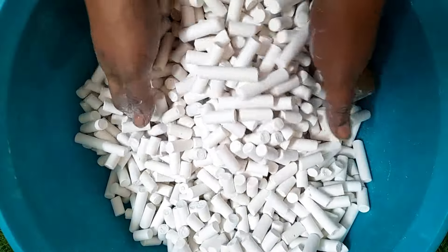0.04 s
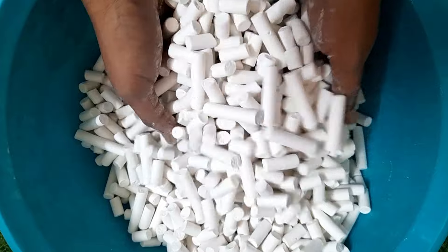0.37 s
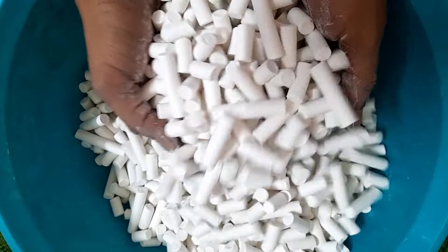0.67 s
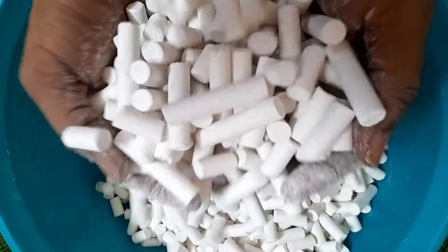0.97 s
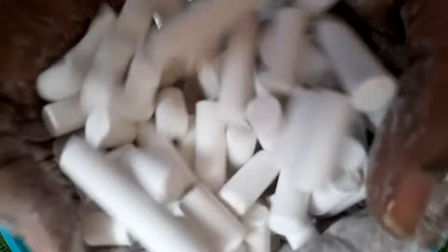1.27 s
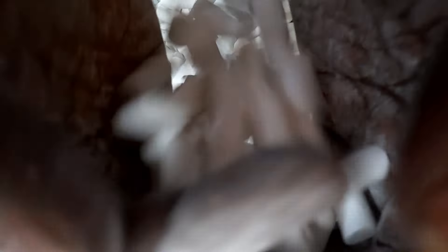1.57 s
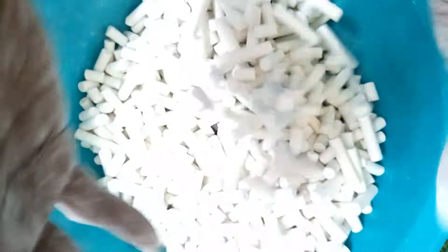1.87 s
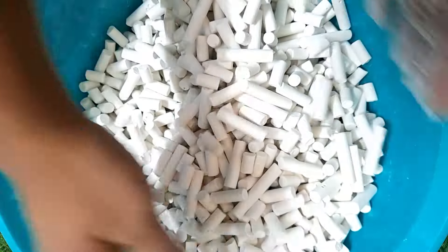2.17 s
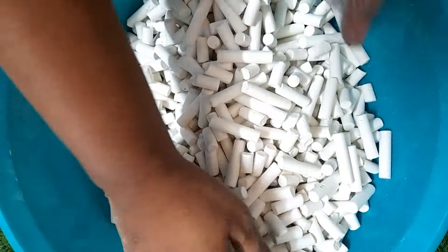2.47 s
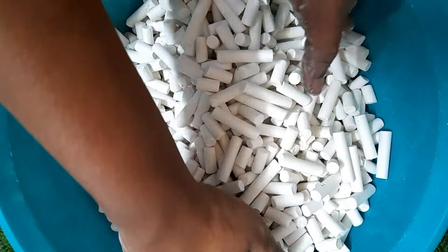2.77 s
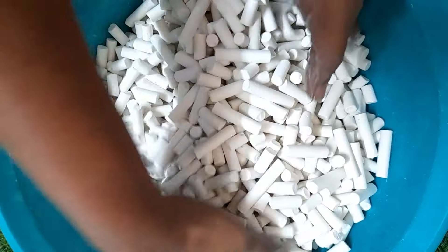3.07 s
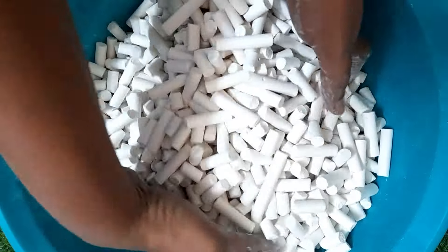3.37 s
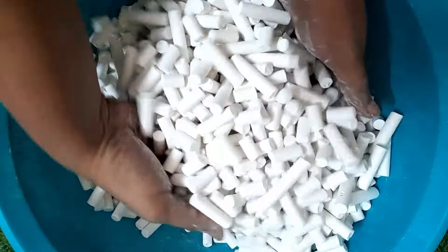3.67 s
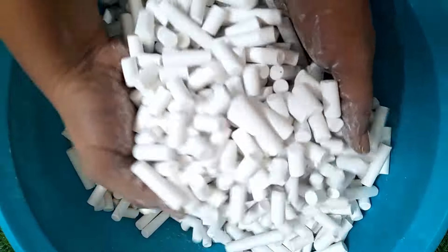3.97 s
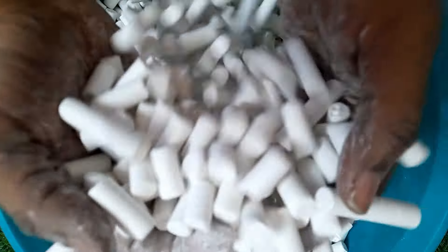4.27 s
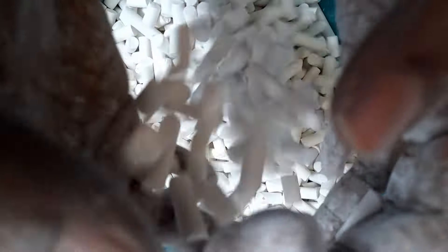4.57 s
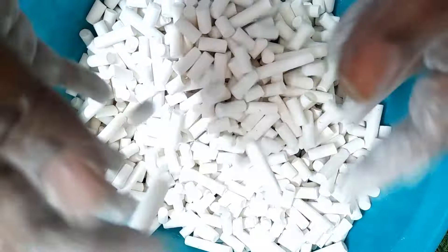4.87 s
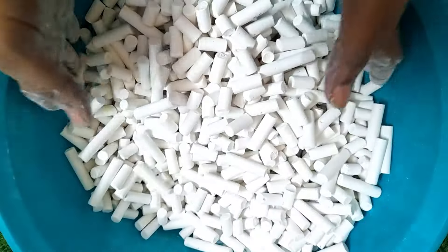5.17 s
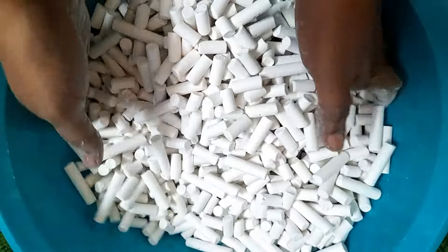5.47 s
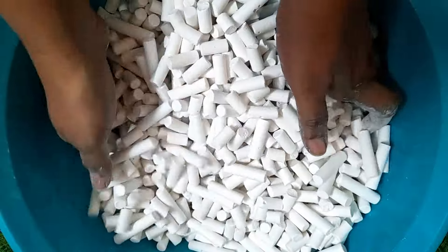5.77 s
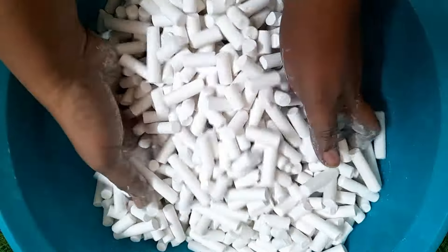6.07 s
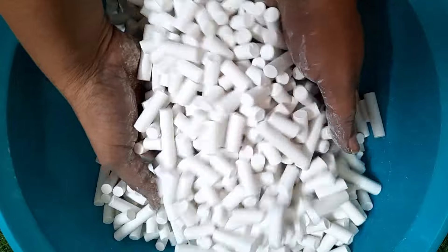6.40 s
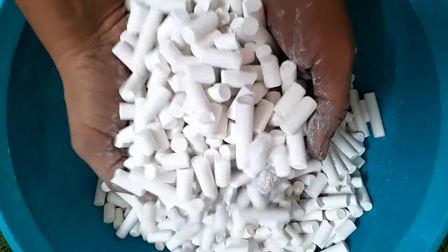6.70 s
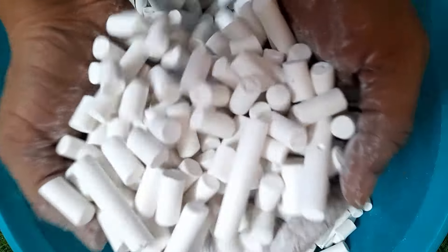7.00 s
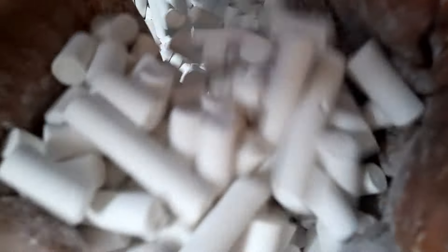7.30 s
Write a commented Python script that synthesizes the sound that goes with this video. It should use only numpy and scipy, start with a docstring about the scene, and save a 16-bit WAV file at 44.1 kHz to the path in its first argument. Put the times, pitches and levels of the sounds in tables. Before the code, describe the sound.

Hands dig into a heap of short chalk sticks in a plastic basin, lift a handful and pour it back. The sticks clack, clink and rub dustily, and those landing knock dully through the plastic. The heap settles, then a scraping dig leads to a second pour, a brief lull and a third scoop. Two close microphones catch it in a quiet room, slightly overloading on the loudest knocks.

```python
"""Two hands shove into short chalk sticks in a plastic basin, lift a handful and pour it back at 1.3 s.
The heap settles. They dig again from 2.5 s, lift at 3.8 s and pour at 4.2 s; they dig once more from
5.2 s and lift a third handful at 6.5 s. Throughout, sticks landing in the heap knock through the basin;
sticks meeting each other clack, clink and rub dustily. Two close microphones hear each contact from
its own side, and the loudest knocks overload them."""
import sys
import numpy as np
from scipy import signal
from scipy.fft import rfft, irfft, next_fast_len
from scipy.io import wavfile
from scipy.ndimage import uniform_filter1d

SR = 44100
rng = np.random.default_rng(int(sys.argv[2]) if len(sys.argv) > 2 else 0)


def store_wav(level_fs):
    """Save 16-bit WAV to argv[1]."""
    pcm = np.round(np.clip(np.atleast_2d(level_fs), -1, 1) * 32767)
    wavfile.write(sys.argv[1], SR, pcm.T.astype(np.int16))


N = 323687

# Hands shove into the heap: start_s, length_s, level_db, scrape_re_level_db
SHOVES = [(-0.02, 0.15, -31.5, -10), (0.074, 0.11, -24, -17), (0.176, 0.063, -24.5, -19),
          (0.236, 0.19, -30, -20), (0.404, 0.038, -24.5, -19), (0.527, 0.099, -23, -24),
          (0.676, 0.077, -27, -15), (2.485, 0.07, -30.5, -2.5), (2.605, 0.18, -38.5, -1),
          (2.818, 0.071, -27, -0.5), (2.96, 0.054, -44, 0), (3.038, 0.22, -29.5, -3.5),
          (3.239, 0.1, -26, -3.5), (3.394, 0.3, -32, -9), (3.488, 0.16, -22, -4.5),
          (3.665, .13, -24.5, -13), (5.155, 0.2, -48, -6), (5.284, 0.11, -32, -8), (5.449, 0.18, -35, -4),
          (5.589, 0.062, -26, -9), (5.678, 0.22, -30.5, -8), (5.849, 0.12, -27.5, -10),
          (5.983, 0.17, -23.5, -10), (6.166, 0.058, -25.5, -16), (6.27, 0.032, -26.5, -11),
          (6.323, .13, -26.5, -11), (6.49, 0.074, -25, -16), (6.672, 0.11, -28, -22),
          (6.81, 0.084, -38, -35)]
# A rising handful sheds sticks: start_s, length_s, level_db
LIFTS = [(0.457, 0.964, -26.5), (3.76, .52, -25), (6.46, .87, -27)]
# Gushes from parting hands: start_s, length_s, level_db, near_mic_treble_db
POURS = [(1.3, 0.15, -30, -0.5), (1.459, 0.34, -29, 3.5), (1.831, 0.16, -29.5, -1), (4.22, 0.14, -29, -0.5),
         (4.356, 0.24, -30.5, -0.5), (4.56, 0.089, -28.5, 2.5), (4.667, 0.098, -30, 0),
         (4.786, .2, -36.5, -2)]
# Heaviest falls: start_s, knock_db, pitch_hz, clack_db, tick_db
HEAVY_FALLS = [(0.0197, -30, 760, -14, -36), (0.198, -8, 540, -12, -27), (0.2167, -7, 614, -9.5, -13),
               (0.31, -8, 816, -6, -10), (0.3244, -8, 1140, -14, -33), (0.4118, -5.5, 607, -13.5, -27),
               (0.4367, -4.5, 523, -23.5, -33), (0.482, -2, 610, -13, -17), (0.5574, -0.5, 665, -16, -23),
               (0.566, -3, 610, -25, -18), (0.586, -4, 1256, -5, -25), (0.7362, -2.5, 613, -11, -24),
               (0.7603, -5.5, 610, -18, -31.5), (0.8478, 0, 656, -20, -29), (0.9102, -14, 1340, -7, -22),
               (0.9432, 2, 567, -14, -26), (1.0429, -3.5, 597, -18, -37), (1.1666, -7, 595, -12, -13),
               (1.1938, -6.5, 653, -11, -16), (1.3639, -5, 875, -19, -28), (1.3984, -7, 553, -25, -34),
               (1.7849, -20, 920, -21, -6), (1.8535, -3, 1190, -10.5, -5.5), (1.9165, -6, 1030, -29, 1.5),
               (1.944, -4, 1200, -18, -24), (1.9514, -6, 1180, -11, -23), (1.9838, 0, 1170, -15, 1),
               (1.9989, -4.5, 760, -17, -29), (2.1423, -36, 547, -39, -18), (2.1587, -24, 1275, -18, -44),
               (2.2672, -31, 1230, -24.5, -36), (2.279, -17, 1204, -24.5, -49),
               (2.4006, -31, 696, -28, -33), (2.5734, -26, 985, -17, -19), (2.6658, -16, 1360, -16, -18),
               (2.6899, -8, 256, -19, -26.5), (2.848, -13, 832, -8.5, -11), (2.9028, -13, 724, -14, -9),
               (2.9493, -20, 1260, -14, -26), (3.0386, -24, 1240, -14.5, -36),
               (3.0963, -23, 1273, -9.5, -23), (3.2904, -24, 1260, -6, -32), (3.2979, -18, 860, -4.5, -23),
               (3.3406, -24, 984, -13.5, -16), (3.361, -5, 865, -14, -18), (3.519, -5, 470, -29, -12),
               (3.5634, -2, 1220, -8, -18), (3.7838, -4, 720, -16, -32), (3.8187, 0, 745, -13, -20),
               (3.9493, 3, 750, -7, -25), (3.9549, 0, 730, -10, -26), (3.9901, -2, 610, -11, -35),
               (4.0404, -4, 580, -11.5, -38), (4.0842, -9, 1190, -8.5, -14), (4.3463, -5, 1200, -14, -23),
               (4.421, -1.5, 1230, -22, -24), (4.4733, -3.5, 775, -11, -25), (4.4959, -7.5, 735, -15, -14),
               (4.6023, -2, 1350, -21, -5), (4.7634, -11, 1120, -11, -10), (4.8613, -3.5, 1240, -12, -31),
               (4.8951, -14, 740, -13.5, -7), (4.9321, -10, 730, -30, -8), (4.9919, -10, 585, -13, -17),
               (5.1384, -24, 650, -28.5, -29), (5.1812, -39, 1336, -20.5, -32),
               (5.3552, -30, 800, -33, -12), (5.4212, -24, 1270, -17.5, -33), (5.6031, -9.5, 564, -19, -46),
               (5.7838, -12, 1200, -13, -22), (5.9441, -7, 670, -11, -29), (6.1404, -2.5, 600, -15, -26),
               (6.2264, -3, 840, -12.5, -37), (6.2711, -4, 799, -11, -32), (6.2819, -5, 520, -7.5, -11),
               (6.3959, -2, 647, -12.5, -11), (6.4865, -4.5, 760, -14, -26), (6.4951, -4, 504, -13.5, -31),
               (6.5379, -2, 850, -13, -29), (6.5836, -1, 600, -13, -27), (6.6613, -2.5, 620, -20.5, -27),
               (6.6862, -7, 1197, -8, -27), (6.8131, -5, 670, -10, -21), (6.8508, 1.5, 567, -5, -11),
               (6.889, 1.5, 560, -9, -9), (6.9655, -3, 565, -28, -8), (7.0457, -2.5, 640, -15, -26),
               (7.1958, -9, 610, -16, -9), (7.2263, -7.5, 570, -16, -16), (7.32, -6, 1470, -9, -26)]
# Clearest free-ringing sticks: start_s, pitch_hz, level_db
CLEAR_PINGS = [(0.679, 9820, -14), (0.697, 9620, -14), (0.967, 10200, -13), (1.037, 6930, -19),
               (1.075, 6900, -18), (1.287, 9860, -13), (1.409, 10510, -10), (1.443, 12150, -2.5),
               (1.599, 9580, -10), (1.66, 7500, -8.5), (2.143, 7860, -19.5), (2.566, 11000, -24),
               (2.948, 10250, -22), (3.177, 12960, -14), (3.633, 12230, -11), (4.273, 9880, -6),
               (4.439, 11500, -14.5), (4.581, 13240, -10), (4.932, 10520, -12), (4.993, 8060, -19),
               (5.18, 8300, -35), (5.655, 9750, -12), (5.734, 9990, -16), (6.13, 12900, -19),
               (6.282, 12900, -18), (6.683, 9740, -14.5), (7.298, 8400, -9.5)]

# Layer offsets per movement: dig_db, knock_db, clack_db, clink_db, tick_db
SHOVE_MIX_DB = (0, 3, 0.5, -11, -7.5)
LIFT_LOW_MIX_DB = (-32, 6, -0.5, -6, -6)
LIFT_HIGH_MIX_DB = (-15.5, 2, -3.5, -1.5, 0.5)
POUR_MIX_DB = (-16, 6, 1, 4, 7)
SETTLE_MIX_DB = (-19, -10, -18, -17, -18)
# Decay of the settling heap, same layer order; bright contacts stop first
SETTLE_DB_PER_S = (13, 32, 26, 45, 41)

# Modes of the loaded basin: pitch_hz, width_hz, gain_db
BASIN_MODES = [(241, 21, -6), (320, 18.4, -1), (380, 21, -4.5), (490.2, 38.4, 6), (580.6, 17, 2.5),
               (712, 48, -1.5), (799, 14, 0), (1070, 83, -3)]
# Room decay: freq_hz, t60_s
ROOM_T60 = [(150, 0.75), (600, 0.38), (1500, 0.5), (4000, 0.44), (9000, 0.19), (16000, 0.26)]
# Layer spectra: freq_hz, gain_db
ROOM_TONE_EQ = [(20, -23), (55, 17.5), (170, 22), (500, -32), (1300, -13), (2000, 9), (4500, -40),
                (8000, -56), (13000, -29), (16000, -39)]
DIG_EQ = [(25, -31), (60, -27), (110, -3.5), (170, -4), (260, 2.5), (420, -8.5), (900, -19), (3000, -42),
          (16000, -63)]
RUB_EQ = [(30, -26), (150, -18), (500, -4.5), (1200, 15.5), (2200, 9.5), (4500, 5.5), (8000, -29),
          (12000, -27), (16000, -28)]
TICK_EQ = [(50, -60), (500, -31), (3000, -4.5), (6000, 0), (9500, -0.5), (13000, -4), (16000, -16)]
CLINK_EQ = [(100, -40), (3000, -25), (6000, -26), (10000, 2.5), (12500, -5.5), (14000, -10), (16000, -1)]
CLACK_EQ = [(30, -42), (150, -20), (600, -5), (1200, 9.5), (2000, 2.5), (3500, -1.5), (5500, -6),
            (8000, -11), (16000, -37)]
KNOCK_EQ = [(25, -18), (60, -15.5), (120, -13.5), (230, -7), (410, -7.5), (480, -4), (800, -1.5),
            (1300, -2), (2500, -17.5), (6000, -15), (16000, -7)]


def amp(db):
    """Decibels to gain."""
    return 10 ** (np.asarray(db) / 20)


def unit_rms(x):
    """x at rms 1."""
    return x / np.sqrt(np.mean(x ** 2) + 1e-20)


def unit_energy(waves):
    """Each event scaled to the energy of 1 s at unit power."""
    return waves / np.sqrt(np.mean(np.sum(waves ** 2, -1, keepdims=True), 0) / SR + 1e-20)


def curve_at(points, hz):
    """Interpolate on a log frequency axis."""
    freq_hz, values = np.transpose(points)
    return np.interp(np.log(hz + 1), np.log(freq_hz + 1), values)


def filtered(x, response):
    """Apply a complex frequency response."""
    size = next_fast_len(N + SR // 2, True)
    return irfft(rfft(x, size) * response(np.fft.rfftfreq(size, 1 / SR)), size)[..., :N]


def convolved(x, impulse):
    """Convolve per channel."""
    return signal.oaconvolve(x, impulse, axes=1)[:, :N]


def coloured(x, eq, samples=4096):
    """Minimum-phase EQ: attacks stay sharp."""
    cepstrum = irfft(np.log(amp(curve_at(eq, np.fft.rfftfreq(samples, 1 / SR)))))
    cepstrum[1:samples // 2] *= 2
    cepstrum[samples // 2:] = 0
    return convolved(x, irfft(np.exp(rfft(cepstrum)))[None])


def diffuse(x, split_hz=750):
    """Diffuse field at two microphones: bass alike, treble unrelated."""
    side = filtered(x[0] - x[1], lambda hz: (hz + split_hz / 10) / np.hypot(hz, split_hz))
    return np.array([x[0] + x[1] + side, x[0] + x[1] - side]) / 2


def diffuse_noise(eq):
    """Coloured noise as a diffuse field."""
    return diffuse(unit_rms(coloured(rng.standard_normal((2, N)), eq)))


def room_tone(gain_db=-53):
    """Faint steady background."""
    return amp(gain_db) * diffuse_noise(ROOM_TONE_EQ)


def room(x, wet_db=-13, block=16384):
    """Add a weak diffuse tail, new for each block; treble dies first."""
    wet = np.zeros((2, N + SR))
    for start in range(0, N, block):
        hz, t, spectra = signal.stft(rng.standard_normal((2, SR // 2)), SR, nperseg=256)
        decay = amp(-60 * t / curve_at(ROOM_T60, hz)[:, None])
        tail = signal.istft(spectra * decay, SR, nperseg=256)[1]
        reverb = signal.fftconvolve(x[:, start:start + block], tail / np.linalg.norm(tail[0]), axes=1)
        wet[:, start + SR // 150:][:, :reverb.shape[1]] += reverb
    return x + amp(wet_db) * diffuse(wet[:, :N], split_hz=620)


def near_walls(x, echo_db=-9, decay_s=0.0038, count=30, drift_hz=0.908):
    """Add early echoes off basin and hands; a steady crossfade stands for hand motion."""
    def echoes():
        delay_s = rng.uniform(0.0015, 0.022, (2, count))
        gain = rng.choice([-1, 1], (2, count)) * np.exp(-delay_s / decay_s)
        taps = np.array([np.bincount((d * SR).astype(int), g, SR // 10) for d, g in zip(delay_s, gain)])
        return convolved(x, taps / np.linalg.norm(taps, axis=1, keepdims=True))
    phase = 2 * np.pi * drift_hz * np.arange(N) / SR
    return x + amp(echo_db) * (np.cos(phase) * echoes() + np.sin(phase) * echoes())


def swell(t, start_s, length_s, stop_db_per_s, attack_s=0.029):
    """Gain of one movement: rise, hold, decay."""
    attack = np.clip((t - start_s) / attack_s, 0, 1)
    return attack * amp(np.minimum(start_s + length_s - t, 0) * stop_db_per_s)


def stirred_db(at_s, shove_stop_db_per_s=204, spill_stop_db_per_s=197):
    """Level of each layer at given times; hand movements add in power."""
    t = np.linspace(0, N / SR, 2000)[:, None]
    gains = []
    for start_s, length_s, level_db, scrape_db in SHOVES:
        tumble_db = -0.21 * scrape_db  # a hand dragging on the bottom topples fewer sticks
        mix_db = np.add(SHOVE_MIX_DB, [scrape_db, tumble_db, 0, 0, 0])
        gains.append(amp(level_db + mix_db) * swell(t, start_s, length_s, shove_stop_db_per_s))
    for start_s, length_s, level_db in LIFTS:
        height = np.clip((t - start_s) / length_s, 0, 1)
        mix_db = (1 - height) * LIFT_LOW_MIX_DB + height * LIFT_HIGH_MIX_DB
        gains.append(amp(level_db + mix_db) * swell(t, start_s, length_s, spill_stop_db_per_s))
    for start_s, length_s, level_db, treble_db in POURS:
        mix_db = np.add(POUR_MIX_DB, [0, 0, 0, treble_db, treble_db])
        gains.append(amp(level_db + mix_db) * swell(t, start_s, length_s, spill_stop_db_per_s))
        gains.append(amp(level_db) * amp(SETTLE_MIX_DB) * swell(t, start_s, length_s, SETTLE_DB_PER_S))
    total_db = 10 * np.log10(np.sum(np.square(gains), 0) + 1e-12)
    layers = ("dig", "knock", "clack", "clink", "tick")
    return {layer: np.interp(at_s, t[:, 0], db) for layer, db in zip(layers, total_db.T)}


def grit(samples, depth_db=3):
    """Fast uneven gain: dry surfaces catch and slip."""
    return unit_rms(amp(depth_db * unit_rms(uniform_filter1d(rng.standard_normal(N), samples))))


def digging(gain_db=-0.5):
    """Fingers push sticks along the plastic bottom: a low scrape."""
    level_db = stirred_db(np.arange(N) / SR)["dig"] + gain_db
    return diffuse_noise(DIG_EQ) * grit(samples=300) * amp(level_db)


def rubbing(gain_db=-4):
    """Chalk slides on chalk and skin: a gritty hiss that follows the clacking."""
    level_db = stirred_db(np.arange(N) / SR)["clack"] + gain_db
    return diffuse_noise(RUB_EQ) * grit(samples=130) * amp(level_db)


def contacts(layer, rate_per_s, spread_db, gain_db):
    """Uneven contact times and gains; mean power follows the layer's level."""
    count = int(rate_per_s * N / SR)
    start_s = np.abs(np.arange(count) + rng.uniform(-2, 2, count)) / rate_per_s
    force = unit_rms(amp(spread_db * np.minimum(rng.exponential(size=count), 2.5)))
    return start_s, force / np.sqrt(rate_per_s) * amp(stirred_db(start_s)[layer] + gain_db)


def scattered(rate_per_s):
    """Uneven times, each with three normal draws."""
    count = int(rate_per_s * N / SR)
    draws = rng.standard_normal((count, 4)).T
    return np.abs(np.arange(count) + 0.5 + 0.5 * draws[0]) / rate_per_s, draws[1:]


def placed(start_s, waves, gain):
    """Sum waves[channel, event, sample] at their start times and gains."""
    index = np.round(start_s * SR).astype(int)[:, None] + np.arange(waves.shape[-1])
    index = np.maximum(index.ravel(), 0)
    return np.array([np.bincount(index, side.ravel(), N)[:N] for side in waves * gain[:, None]])


def ages_s(lead_ms, samples):
    """Time since each contact reached each microphone; positive lead is left first."""
    half_s = np.asarray(lead_ms)[:, None] / 2000
    age_s = np.arange(samples) / SR - abs(half_s) + np.array([half_s, -half_s])
    return np.maximum(age_s, 0).astype(np.float32)


def random_pan(count, spread_db):
    """Left and right gains of contacts scattered over the heap."""
    gain = amp(rng.normal(0, 1, (count, 2)).T * spread_db)
    return (gain / np.sqrt(np.mean(gain ** 2, 0)))[:, :, None]


def ring(t, pitch_hz, decay_s, rise_s):
    """Damped sines with a soft start, one per event."""
    pitch_hz, decay_s = np.float32(pitch_hz)[:, None], np.float32(decay_s)[:, None]
    return np.sin(2 * np.pi * pitch_hz * t) * np.exp(-t / decay_s) * (1 - np.exp(-t / np.float32(rise_s)))


def burst(t, decay_s, coherence):
    """Noise cracks, partly shared by both microphones."""
    count, samples = t.shape[1:]
    index = np.minimum((t * SR).astype(int), samples - 1)
    shared = rng.standard_normal((count, samples))[np.arange(count)[:, None], index]
    noise = np.sqrt(coherence) * shared + np.sqrt(1 - coherence) * rng.standard_normal(t.shape)
    return noise * np.exp(-t / decay_s) * (t > 0)


def ticks():
    """Edges catch and slip: tiny sharp ticks."""
    start_s, gain = contacts("tick", rate_per_s=620, spread_db=5, gain_db=0)
    t = ages_s(lead_ms=rng.normal(0, 0.22, len(gain)), samples=220)
    waves = unit_energy(burst(t, decay_s=0.00088, coherence=1))
    return placed(start_s, waves * random_pan(len(gain), spread_db=2), gain)


def clinks(centre_hz=9600, decay_s=0.0016):
    """Loose sticks ring in their first bending mode; each length has its own pitch."""
    start_s, gain = contacts("clink", rate_per_s=420, spread_db=5, gain_db=-3)
    count = len(gain)
    pitch_hz = np.clip(centre_hz * rng.lognormal(0, 0.196, count), 3000, 20000)
    decays_s = decay_s * rng.lognormal(0, 0.31, count)
    t = ages_s(lead_ms=rng.normal(0, 0.225, count), samples=700)
    waves = unit_energy(ring(t, pitch_hz, decays_s, rise_s=0.0001))
    return coloured(placed(start_s, waves * random_pan(count, spread_db=3.5), gain), CLINK_EQ)


def faint_pings(centre_hz=9700, above_clinks_db=7, spread_db=2):
    """Rows like CLEAR_PINGS: sticks that ring out among the clinking."""
    start_s, (force, detune, _) = scattered(rate_per_s=20)
    level_db = stirred_db(start_s)["clink"] + above_clinks_db + spread_db * force
    return np.transpose([start_s, centre_hz * np.exp(0.17 * detune), level_db])


def free_sticks(decay_s=0.005, rebound_db=-8):
    """A stick bouncing clear rings louder and longer, and again on landing."""
    start_s, pitch_hz, level_db = np.vstack([CLEAR_PINGS, faint_pings()]).T
    count = len(start_s)
    decays_s = decay_s * rng.lognormal(0, 0.05, count)
    t = ages_s(lead_ms=rng.normal(0, 0.2176, count), samples=2200)
    waves = ring(t, pitch_hz, decays_s, rise_s=0.00014) * random_pan(count, spread_db=0.5)
    landing_s = start_s + rng.uniform(0.007, 0.032, count)
    return placed(start_s, waves, amp(level_db)) + placed(landing_s, waves, amp(level_db + rebound_db))


def clacks():
    """Sticks pinned by their neighbours crunch together: short dry contacts."""
    start_s, gain = contacts("clack", rate_per_s=520, spread_db=8, gain_db=5)
    t = ages_s(lead_ms=rng.normal(0, 0.2, len(gain)), samples=280)
    waves = unit_energy(burst(t, decay_s=0.0019, coherence=0.51))
    return placed(start_s, waves * random_pan(len(gain), spread_db=1), gain)


def basin(x, ring_db=-4.5):
    """Knocks pass through the heap and briefly ring the plastic shell."""
    def shell(hz):
        return sum(amp(gain_db) * 1j * hz * width_hz / (pitch_hz ** 2 - hz ** 2 + 1j * hz * width_hz)
                   for pitch_hz, width_hz, gain_db in BASIN_MODES)
    return coloured(x, KNOCK_EQ) + amp(ring_db) * filtered(x.mean(0), shell)


def knocks(centre_hz=680):
    """Sticks tumble onto the heap: dull pushes of a few cycles."""
    start_s, gain = contacts("knock", rate_per_s=480, spread_db=4, gain_db=-1)
    count = len(gain)
    pitch_hz = np.clip(centre_hz * rng.lognormal(0, 0.27, count), 400, 2000)
    t = ages_s(lead_ms=rng.normal(0, 0.19, count), samples=600)
    waves = unit_energy(ring(t, pitch_hz, decay_s=1 / pitch_hz, rise_s=0.00022))
    polarity = rng.choice([-1, 1], count)
    return placed(start_s, waves * random_pan(count, spread_db=1), gain * polarity)


def light_falls(centre_hz=820, spread_db=3.4):
    """Rows like HEAVY_FALLS: lighter falls that follow the stirring."""
    start_s, (force, detune, sharpness) = scattered(rate_per_s=13)
    level_db = stirred_db(start_s)
    knock_db = level_db["knock"] + 10 + spread_db * force
    clack_db = level_db["clack"] + 7 + spread_db * force
    tick_db = level_db["tick"] + 7 + spread_db * (force + sharpness)
    return np.transpose([start_s, knock_db, centre_hz * np.exp(0.24 * detune), clack_db, tick_db])


def falls(rows, clack_gain_db=6, tick_gain_db=1, bounce_db=-13, lead_ms_per_octave=0.15, pan_db_per_ms=5):
    """Each fall gives a knock, a clack and a tick; a small bounce repeats the last two."""
    start_s, knock_db, pitch_hz, clack_db, tick_db = np.transpose(rows)
    count = len(start_s)
    # Higher knocks lie to the left; the microphone reached first hears a fall louder.
    lead_ms = lead_ms_per_octave * np.log2(pitch_hz / np.median(pitch_hz)) + rng.normal(0, 0.13, count)
    pan = random_pan(count, spread_db=0.5) * amp(pan_db_per_ms * np.array([lead_ms, -lead_ms]))[..., None]
    t = ages_s(lead_ms, samples=900)
    push = -ring(t, pitch_hz, decay_s=0.85 / pitch_hz, rise_s=0.00071)
    push /= abs(push).max(-1, keepdims=True)
    bounce_s = start_s + rng.uniform(0.0024, 0.012, count)

    def bounced(waves, db):
        return placed(start_s, waves * pan, amp(db)) + placed(bounce_s, waves * pan, amp(db + bounce_db))
    knock = placed(start_s, push * pan, amp(knock_db))
    clack = bounced(burst(t, decay_s=0.0018, coherence=0.75), clack_db + clack_gain_db)
    tick = bounced(burst(t, decay_s=0.00098, coherence=0.18), tick_db + tick_gain_db)
    return knock, clack, tick


def scene(dull_pan_db=0.36, clack_pan_db=-1.36):
    """Chalk in the basin, in a quiet room; positive pan is left."""
    knock, clack, tick = falls(np.vstack([HEAVY_FALLS, light_falls()]))
    dull = (basin(knock + knocks()) + digging()) * amp([[dull_pan_db], [-dull_pan_db]])
    clatter = coloured(clack + clacks(), CLACK_EQ) * amp([[clack_pan_db], [-clack_pan_db]])
    bright = coloured(tick + ticks(), TICK_EQ) + clinks() + free_sticks()
    return room(dull + near_walls(clatter + bright) + rubbing()) + room_tone()


def record(dry, low_cut_hz=45, top_hz=16000):
    """Microphones: bass roll-off, soft clip at full scale, band limit."""
    heard = filtered(dry, lambda hz: 1j * hz / (low_cut_hz + 1j * hz))
    clipped = heard / (1 + abs(heard) ** 10) ** (1 / 10)
    return filtered(clipped, lambda hz: hz < top_hz)


dry = scene()
out = record(dry)
store_wav(out)
```